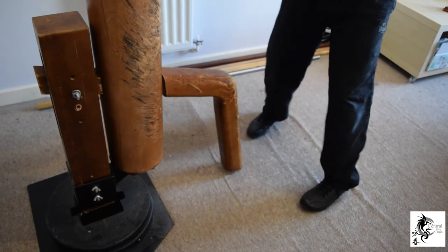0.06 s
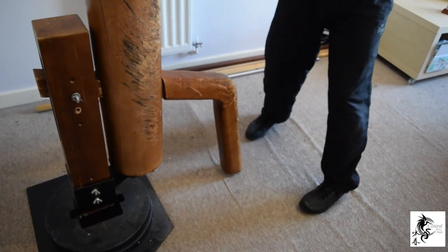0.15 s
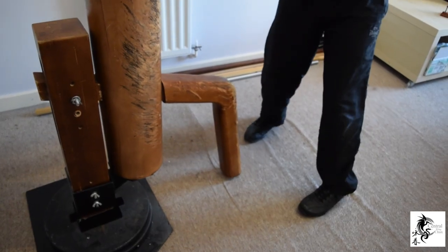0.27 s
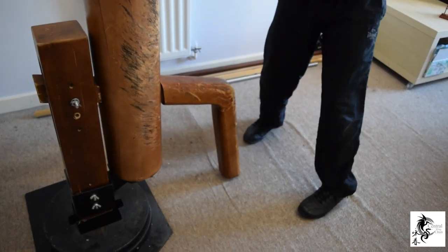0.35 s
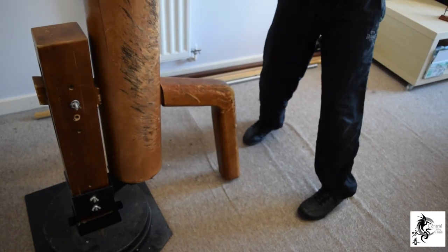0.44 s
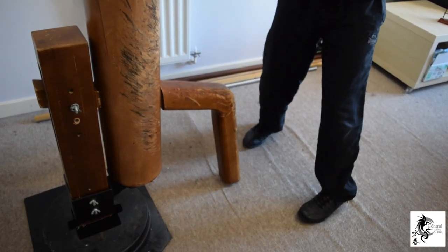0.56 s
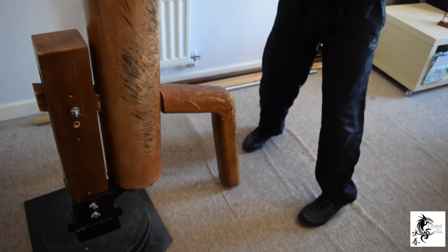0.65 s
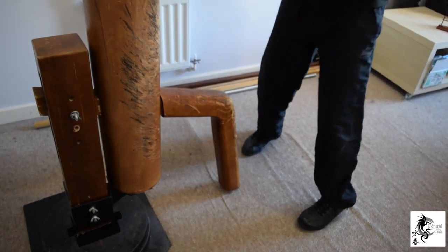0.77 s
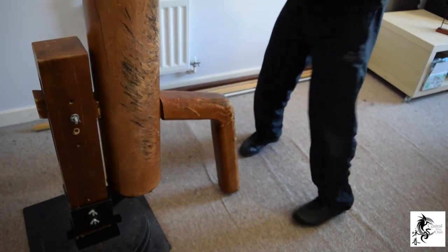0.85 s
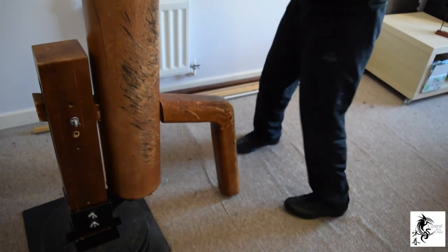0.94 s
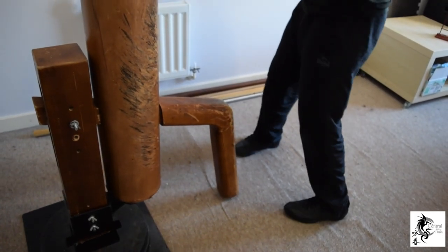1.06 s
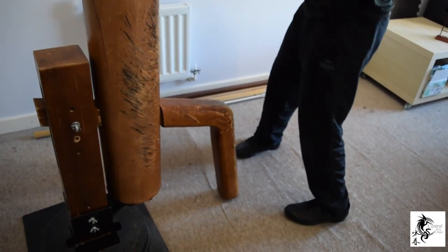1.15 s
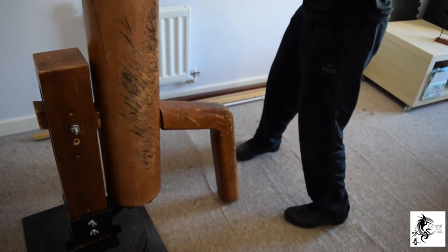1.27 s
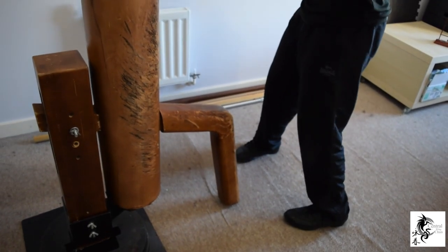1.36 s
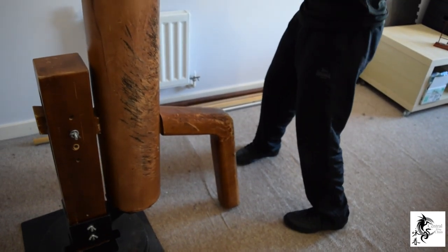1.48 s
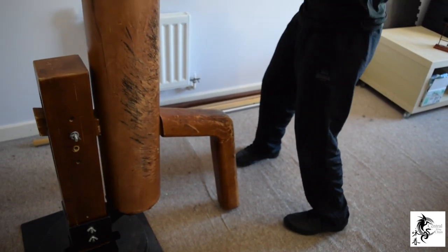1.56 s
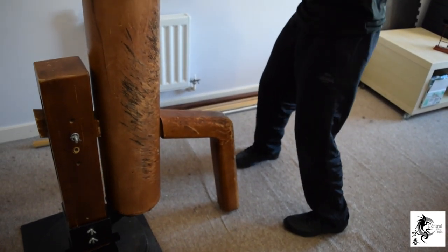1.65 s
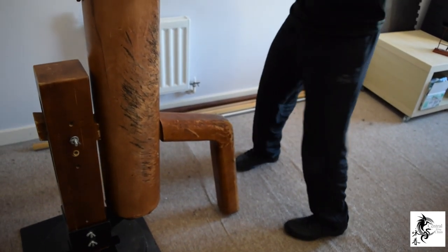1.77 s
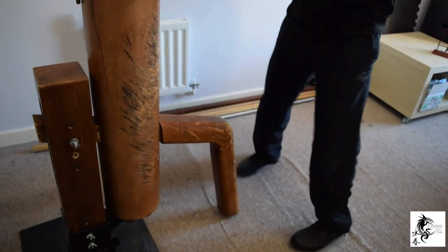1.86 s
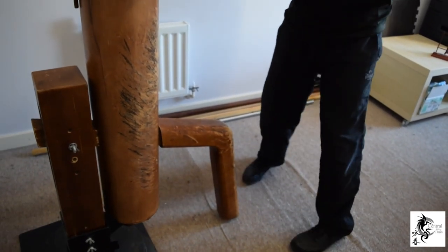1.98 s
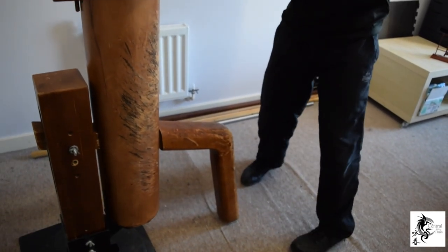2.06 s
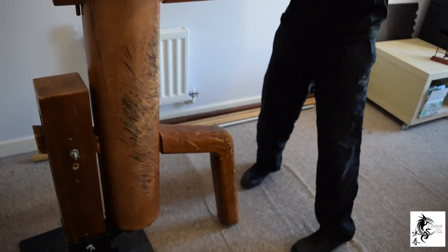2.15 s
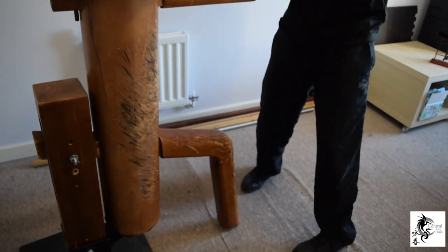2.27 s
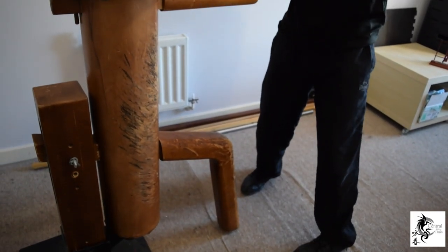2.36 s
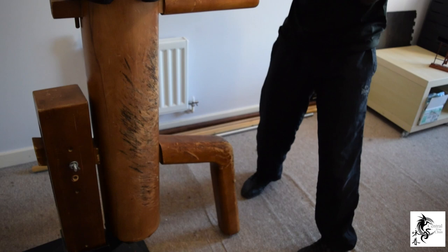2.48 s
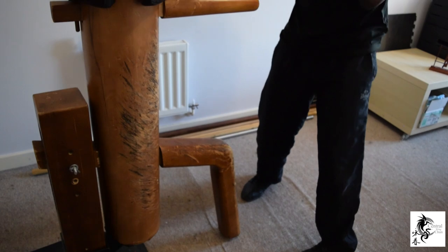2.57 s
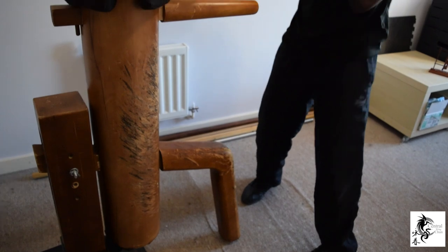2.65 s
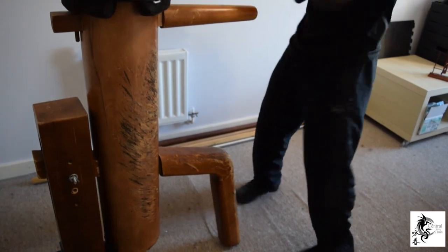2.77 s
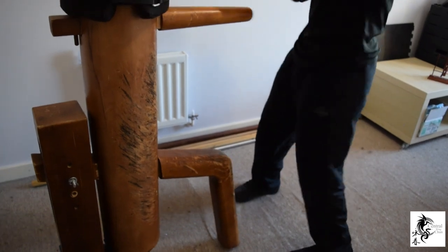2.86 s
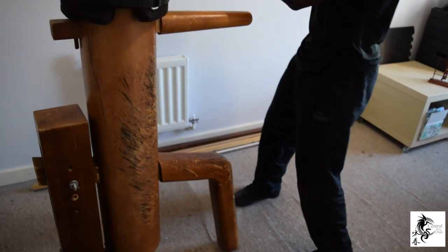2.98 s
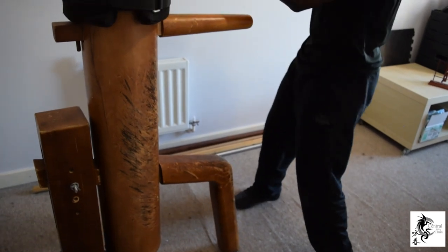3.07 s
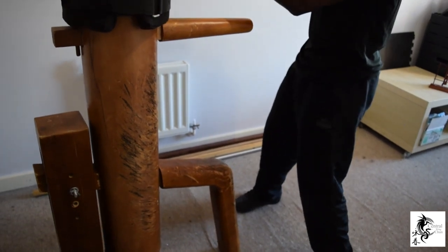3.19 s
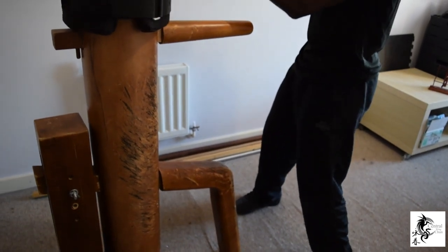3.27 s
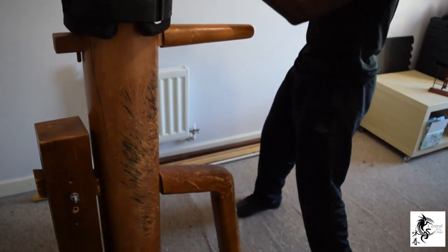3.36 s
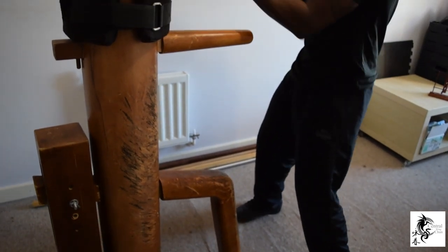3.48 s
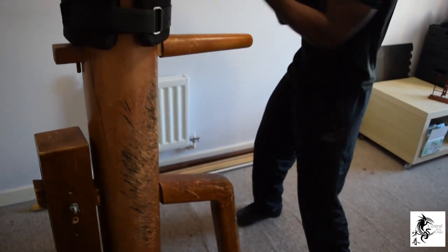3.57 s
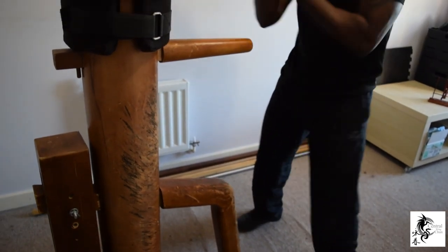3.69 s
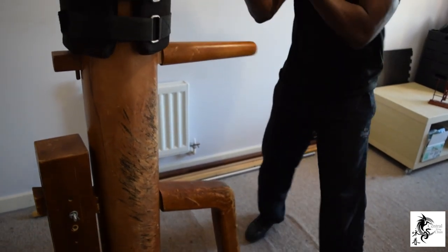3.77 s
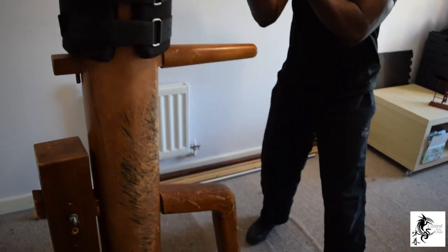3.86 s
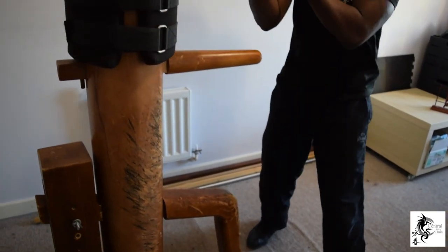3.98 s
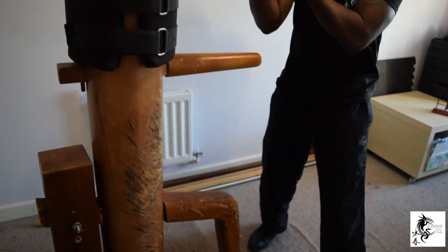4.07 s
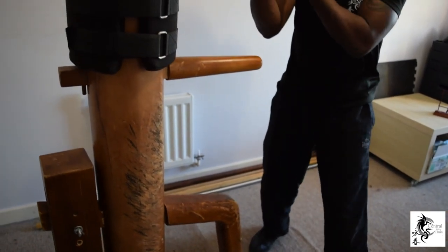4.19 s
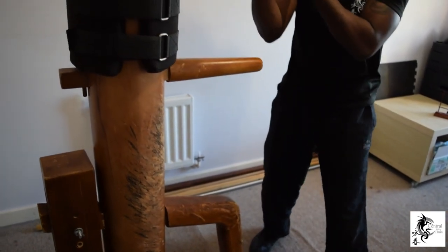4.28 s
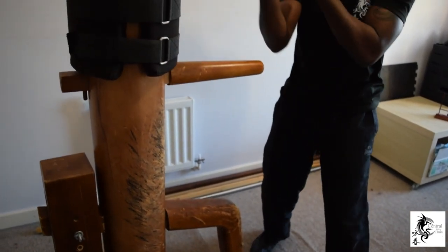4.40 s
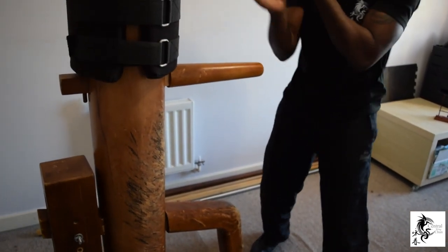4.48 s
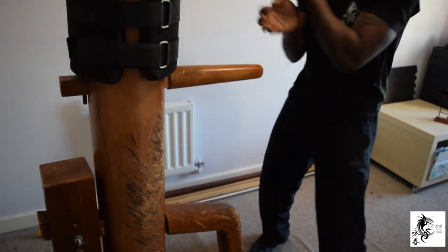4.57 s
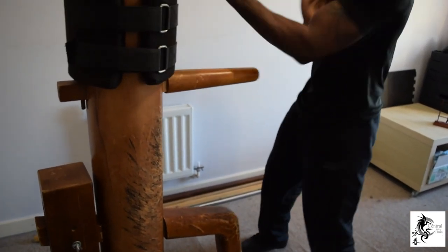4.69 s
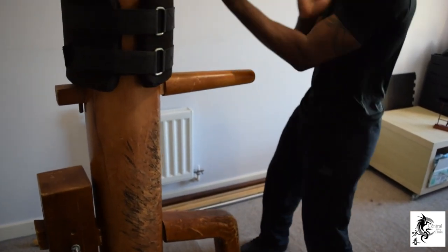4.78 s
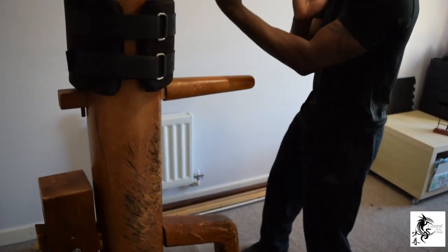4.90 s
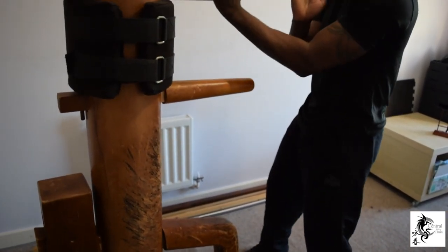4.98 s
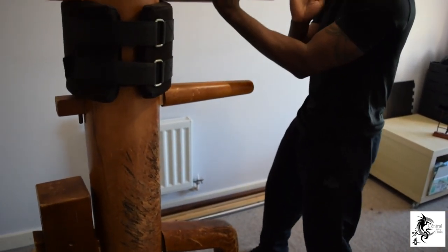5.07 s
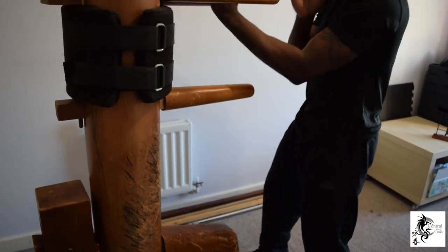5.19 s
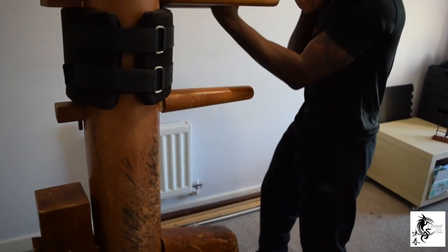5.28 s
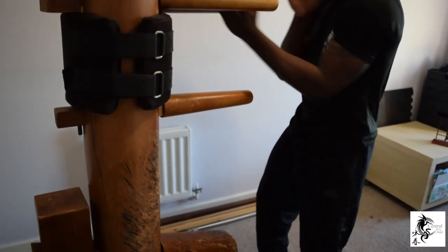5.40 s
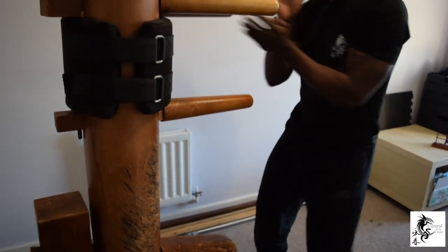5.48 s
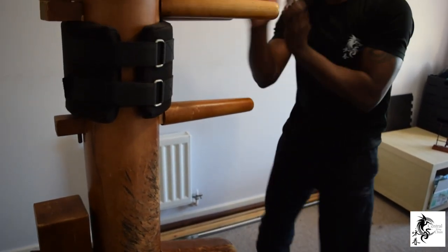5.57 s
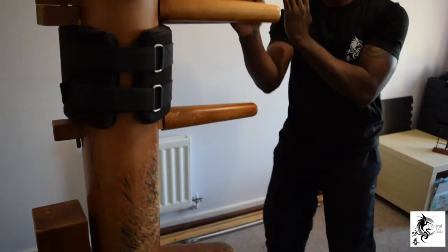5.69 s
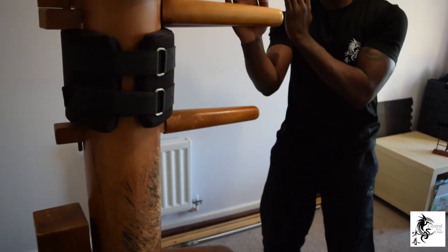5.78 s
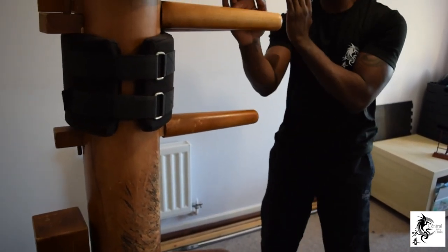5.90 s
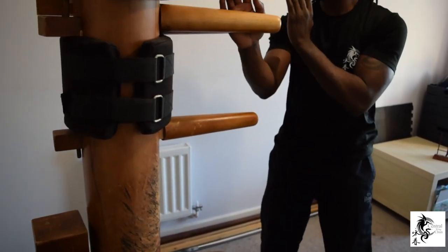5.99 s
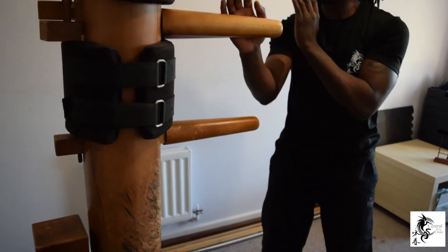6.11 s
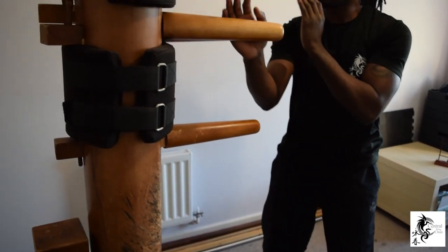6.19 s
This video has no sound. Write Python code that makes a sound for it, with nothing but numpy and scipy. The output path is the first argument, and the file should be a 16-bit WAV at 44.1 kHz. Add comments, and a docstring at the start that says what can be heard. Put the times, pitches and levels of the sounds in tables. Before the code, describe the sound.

A soft flurry of woody knocks opens, then one bright crack on a wooden arm, followed by several quick double and triple knocks on a hollow trunk. Skin slaps sharpen them, loose parts rattle, cloth swishes just before. Between them are faint touches and a very low hush. Small furnished room, microphone a couple of metres away, loudest hits slightly flattened.

```python
"""A small carpeted room, where a wooden training dummy is struck a couple of metres from the microphone.
Blows and rebounds ring clusters of dying sines for trunk, arms, sockets and base, under noise slaps and brushes;
a peg, strap buckles and a small fitting rattle along, and the trunk and a radiator ring on.
Shaped cloth noise gives the sleeves, random taps the room; a thin whistle and a hush lie behind.
The loudest peaks overload the microphone."""
import sys
import numpy as np
from scipy import signal
from scipy.fft import rfft, irfft, next_fast_len
from scipy.io import wavfile
from scipy.ndimage import uniform_filter1d

SR = 44100
rng = np.random.default_rng(int(sys.argv[2]) if len(sys.argv) > 2 else 0)


def bounce(signal):
    """Save signal as a 16-bit WAV file at the path given by the first command-line argument."""
    frames = np.transpose(np.atleast_2d(signal))
    limited = np.clip(frames, -1, 1)
    pcm = np.round(limited * 32767).astype(np.int16)
    wavfile.write(sys.argv[1], SR, pcm)


N = 275267

# Blows and rebounds, levels before the mix:
# (time [s], trunk [dB], arm [dB], socket [dB], slap [dB], contact [ms])
KNOCKS = [(0.047, -25.5, -47.5, -25.5, -23, 5.2), (0.063, -17, -42.5, -37, -22, 4.7),
          (0.112, -21.5, -42.5, -40, -34, 5.3), (0.123, -20.5, -26, -26.5, -33, 6.7),
          (0.169, -29, -29, -41.5, -33, 3.9), (0.196, -25.5, -35, -38.5, -37.5, 7.3),
          (0.261, -38, -52.5, -65, -54, 8), (0.403, -39.5, -51.5, -49, -53.5, 12),
          (0.448, -30.5, -41, -36, -31, 5.3), (0.767, -51.5, -46, -46.5, -48.5, 4.9),
          (1.014, -16, -2, -22, -10, 1.8), (1.034, -34.5, -27, -15.5, -29.5, 2),
          (1.06, -25.5, -24.5, -34.5, -46.5, 2.8), (1.116, -65, -22, -42, -40.5, 3),
          (1.203, -30, -30.5, -36.5, -32, 7), (1.425, -68.5, -57.5, -81, -52.5, 5.5),
          (1.556, -48.5, -58.5, -65, -67, 6.3), (1.912, -53.5, -56, -61, -44, 4.9),
          (1.954, -7, -12, -38.5, -9.5, 1.8), (1.986, -13.5, -28, -20, -12, 4.3),
          (2.017, -11, -16.5, -28, -25.5, 5.6), (2.055, -23, -27.5, -20, -40.5, 4),
          (2.48, -56, -62, -61, -59.5, 7), (2.892, -16, -15, -20, -23.5, 7.4),
          (2.922, -8.5, -16, -12, -20, 3.8), (2.944, -27, -25.5, -21.5, -26.5, 3),
          (3.021, -25, -32.5, -37, -32, 8), (3.074, -64, -42.5, -56, -35.5, 4),
          (3.232, -32.5, -34.5, -34.5, -43, 8.4), (3.422, -73, -67, -49.5, -47.5, 4),
          (3.808, -4, -21.5, -25.5, -16.5, 6.7), (3.82, -18, -8, -9, -12.5, 3.6),
          (3.84, -19, -43.5, -21.5, -6, 1.7), (3.88, -10, -53, -15, -19, 4.1),
          (4.17, -38.5, -46, -48, -50.5, 8), (4.733, -10.5, -11.5, -26, -20.5, 2.9),
          (4.749, -50, -13, -21, -24, 3.5), (4.799, -16, -23.5, -22, -33, 2.3),
          (5.115, -41, -42.5, -45, -57, 9.5), (5.165, -61, -75, -58, -47.5, 5),
          (5.224, -43, -49.5, -48.5, -51, 13), (5.249, -33, -38.5, -39, -38, 4.2),
          (5.556, -63, -56, -74, -64, 6), (5.663, -9.5, -18.5, -26, -23, 4.6),
          (5.676, -11, -25, -25, -26.5, 5.5), (5.712, -12.5, -19, -16, -20, 5.3),
          (6, -30, -31.5, -39, -31, 6.7)]
# Wooden modes of the trunk, the arms, the arm-to-trunk sockets and the base:
# (frequency [Hz], relative level [dB], t60 [s])
TRUNK_MODES = [(443, -31, 0.16), (607.3, -16.5, 0.01), (621.6, 2, 0.044), (720, -18, 0.072),
               (809, -1.5, 0.047), (809, 18, 0.019)]
ARM_MODES = [(982, 5.5, 0.02), (1038, 0, 0.019), (1108, -5.5, 0.028), (1251, 5, 0.019), (1297, -0.5, 0.018),
             (2076, -11, .03), (2740, -15, 0.029)]
SOCKET_MODES = [(1370.4, -11, 0.037), (1555, 6.5, 0.019), (1831, -8.5, 0.041), (2077, -10.5, 0.017),
                (2402, -7.5, .03), (2650, -31, 0.011), (2910, -20, .02)]
BASE_MODES = [(60, -28, 0.058), (137, -13.5, 0.037), (243, -2.5, 0.026), (312.6, -12.5, 0.087),
              (417, 6.5, 0.018)]
# Tone of the slapping skin, and of skin sliding onto wood: (frequency [Hz], relative level [dB])
SLAP_TONE = [(300, -7.5), (1000, 8.5), (2500, 3), (5000, -7.5), (9000, -17), (15000, -27)]
BRUSH_TONE = [(400, -5.5), (1200, -3.5), (3000, -7), (8000, -24.5)]
# The trunk's long after-ring: (frequency [Hz], level [dB], t60 [s])
TRUNK_AFTER_RING = [(770, -33, .9), (808, -30.5, 1.01), (836, -32.5, .9)]
# A radiator ringing along with the arm: (level [dB], t60 [s])
RADIATOR = (-35, 1.3)
# Extra low thud of the base at some knocks, light and heavy: (time [s], level [dB])
BASE_THUDS = [(0.048, -38), (0.124, -32.5), (0.197, -38.5), (1.203, -35), (1.953, -32), (2.892, -19.5),
              (2.944, -33), (3.232, -43.5), (3.808, -27), (3.82, -27), (3.88, -35), (4.749, -26),
              (5.711, -34.5), (5.999, -41.5)]
# Peg and buckles rattling along with some of the knocks: (time [s], peg [dB], buckles [dB])
RATTLES = [(0.122, -30.5, -56), (1.016, -32, -43.5), (1.953, -39, -40), (1.988, -26.5, -32),
           (2.016, -25, -27), (2.056, -36, -45), (2.891, -45, -54), (2.922, -37, -46), (3.021, -54.5, -57),
           (3.421, -87, -62.5), (3.808, -24.5, -61.5), (3.821, -40, -38.5), (3.84, -21.5, -19.5),
           (3.879, -33, -54), (4.749, -34.5, -48.5), (4.798, -35.5, -54.5), (5.712, -25.5, -44),
           (5.998, -47, -81)]
# The small fitting ticking: (time [s], level [dB])
TICKS = [(0.063, -35), (3.232, -65), (3.425, -57), (5.252, -63), (5.305, -59)]
# Modes of the arm's locking peg, the pad-strap buckles and the small loose fitting:
# (frequency [Hz], relative level [dB], t60 [s])
PEG_MODES = [(3850, 0, .03), (3980, -3, .03), (4350, -7, .025)]
BUCKLE_MODES = [(5600, -13, .012), (6100, -13, .012), (9600, -2, .015), (10000, 0, .015),
                (11200, -10, .015)]
FITTING_MODES = [(5300, -3, .02), (5650, 0, .02), (6000, -4, .02)]
# Sleeves swinging: (start [s], end [s], level at the end [dB], swell over the swing [dB])
SLEEVES = [(-0.04, 0.06, -34.5, -1), (0.66, 0.755, -65.5, 9.5), (0.9, 1.005, -49.5, -5),
           (1.83, 1.938, -50.5, -4), (2.27, 2.46, -77, -17.5), (2.78, 2.92, -44.5, 2.5),
           (3.27, 3.415, -66, -8), (3.7, 3.797, -43, 10.5), (4.63, 4.733, -45.5, -0.5),
           (5.54, 5.67, -41, 12.5)]
# Tone of the cloth: (frequency [Hz], relative level [dB])
CLOTH_TONE = [(59, -42), (100, -25.5), (241, -16), (391, -7), (1110, 1), (1660, -2.5), (2320, -6),
              (9660, -18), (15000, -26.5)]
# Decay of the room per band: (frequency [Hz], t60 [s])
ROOM_DECAY = [(100, 0.36), (300, 0.58), (800, 0.39), (1500, 0.47), (3000, 0.33), (6000, 0.46),
              (12000, 0.24)]
# Carpet and furniture dulling the echoes: (frequency [Hz], gain [dB])
WALL_TONE = [(200, -2.5), (1000, -1), (3000, -4.5), (7000, -8.5), (14000, -9)]
# Thin faint whistles, as of a bird outside, one list each: (time [s], frequency [Hz], level [dB])
WHISTLES = [
    [(1.27, 9800, -80), (1.36, 9100, -81), (1.47, 7500, -87)],
    [(4.95, 9500, -94), (5.02, 9160, -81), (5.14, 8800, -95)],
]
# Tone of the background hush: (frequency [Hz], relative level [dB])
HUSH_TONE = [(24, -38.5), (40, -7.5), (54, -8), (136, -16.5), (522, -18), (797, -8), (1190, -13),
             (1280, -11.5), (10900, -31.5), (13700, -43), (15500, -57)]
# Microphone colour: (frequency [Hz], gain [dB])
MIC_TONE = [(40, -10.5), (150, -9.5), (300, -1.5), (600, -3)]
# Colour of the difference between the two microphone ports: (frequency [Hz], gain [dB])
WIDTH_TONE = [(60, -20), (150, -23), (380, -42.5), (950, -22), (2380, -12), (5980, -12.5), (15000, 1.5)]

THUD_DB, THUD_SLOPE = -35.5, 0.47  # the base thuds more as the knock grows, but far less than in step
WOOD_SPREAD, LOOSE_SPREAD = .022, .028  # relative width of a mode cluster
BLUR_PER_MS, BLUR_FROM_MS = .01, 4.5  # a long contact smears the modes
SLAP_STRETCH = 1.445  # the slap peaks this many contact times after the touch
BRUSH_DB, BRUSH_DB_PER_MS = -16.5, -0.55  # a long contact lands with less of a brush
RADIATOR_HZ = 1208
BASE_THUD_MS, RATTLE_MS = 2.6, 2.8  # rise times
SWING_RISE_S, SWING_FROM_DB = 0.031, -19.5  # each swing starts this far below the end of its rise
SWING_ON_S = 0.0088  # the cloth moves on into the blow
HUSH_DB = -70
EDGE_HZ = 15750  # upper band limit


def gain_of(db):
    """Turns decibels into amplitude."""
    return 10 ** (np.asarray(db) / 20)


def evened(x):
    """Scales a sound to rms 1."""
    return x / np.sqrt(np.mean(x ** 2) + 1e-20)


def read(points, hz):
    """Reads a (frequency, value) table on a log-frequency axis."""
    f, value = np.transpose(points)
    return np.interp(np.log(hz + 1), np.log(f + 1), value)


def add(mix, s, sound):
    """Mixes a sound in at s seconds."""
    part = mix[round(s * SR):][:len(sound)]
    part += sound[:len(part)]


def coloured(x, points):
    """Filters x by a (frequency, dB) table."""
    size = next_fast_len(len(x))
    gain = gain_of(read(points, np.fft.rfftfreq(size, 1 / SR)))
    return irfft(rfft(x, size) * gain, size)[:len(x)]


def chances(*shape):
    """Draws level, detune and phase for up to seven modes of four sines each."""
    return rng.standard_normal((*shape, 3, 7, 4))


def ring(modes, chance, rise_ms, spread):
    """Each mode is a close cluster of dying sines, with levels, detuning and phases random for each ring."""
    hz, db, t60 = np.transpose(modes)[:, :, None, None]
    loud, detune, phase = chance[:, :len(modes), :, None]
    t = np.arange(3500) / SR
    scatter_db = 1.5
    waves = np.sin(2 * np.pi * (hz * (1 + spread * detune) * t + phase))
    decay = gain_of(db + scatter_db * loud - 60 * t / t60)
    rings = (decay * waves).sum((0, 1))
    rings = rings * (1 - np.exp(-(t * 1000 / rise_ms) ** 2))  # a soft contact swells in
    return rings / np.sqrt(np.mean(rings[:900] ** 2))  # the first 20 ms set the level


def wood_knocks():
    """Each contact swells the modes of trunk, arm, socket and base; longer contacts rise slower."""
    out = np.zeros(N)
    parts = (TRUNK_MODES, ARM_MODES, SOCKET_MODES, BASE_MODES)
    for (s, trunk_db, arm_db, socket_db, _, ms), chance in zip(KNOCKS, chances(len(KNOCKS), 4)):
        thud_db = THUD_DB + THUD_SLOPE * max(trunk_db, arm_db, socket_db)
        spread = WOOD_SPREAD + BLUR_PER_MS * max(ms - BLUR_FROM_MS, 0)
        for db, modes, c in zip((trunk_db, arm_db, socket_db, thud_db), parts, chance):
            add(out, s - .002, gain_of(db) * ring(modes, c, ms, spread))
    return out


def skin():
    """A burst of noise slaps at each contact, after a short brush of skin on wood just before it."""
    out = np.zeros(N)
    for s, trunk_db, arm_db, _, slap_db, ms in KNOCKS:
        noise = evened(coloured(rng.standard_normal(2500), SLAP_TONE))
        u = np.arange(2500) / SR * 1000 / (SLAP_STRETCH * ms)
        add(out, s, gain_of(slap_db) * noise * u * np.exp(1 - u))
        brush = np.hanning(300) * evened(coloured(noise[-300:], BRUSH_TONE))
        brush_db = max(trunk_db, arm_db) + BRUSH_DB + BRUSH_DB_PER_MS * ms
        add(out, s - .006, gain_of(brush_db) * brush)
    return out


def after_rings():
    """Trunk blows set off long hollow sines, and arm blows a radiator sine; both swell in and die."""
    arms, trunks = np.zeros((2, N))
    for s, trunk_db, arm_db, *_ in KNOCKS:
        add(arms, s, gain_of([arm_db]))
        add(trunks, s, gain_of([trunk_db]))
    t = np.arange(SR) / SR

    def dying_sine(hz, db, t60):
        """A sine losing 60 dB in t60 seconds."""
        return gain_of(db - 60 * t / t60) * np.sin(2 * np.pi * hz * t)

    radiator = dying_sine(RADIATOR_HZ, *RADIATOR) * (1 - np.exp(-t / .02))
    hollow = sum(dying_sine(*row) for row in TRUNK_AFTER_RING) * (1 - np.exp(-t / .03))
    return (signal.fftconvolve(arms, radiator) + signal.fftconvolve(trunks, hollow))[:N]


def struck(rows, modes, rise_ms, spread):
    """Rings one part alone at each (time, dB) row."""
    out = np.zeros(N)
    for (s, db), c in zip(rows, chances(len(rows))):
        add(out, s, gain_of(db) * ring(modes, c, rise_ms, spread))
    return out


def base_thuds():
    """The base modes ring once more, as an extra low thud at some knocks."""
    return struck(BASE_THUDS, BASE_MODES, BASE_THUD_MS, WOOD_SPREAD)


def rattles():
    """The peg and the buckles ring their own modes along with some of the knocks."""
    pegs = [(s, peg_db) for s, peg_db, _ in RATTLES]
    buckles = [(s, buckles_db) for s, _, buckles_db in RATTLES]
    return (struck(pegs, PEG_MODES, RATTLE_MS, LOOSE_SPREAD)
            + struck(buckles, BUCKLE_MODES, RATTLE_MS, LOOSE_SPREAD))


def fitting_ticks():
    """The small loose fitting rings its high modes at each tick."""
    return struck(TICKS, FITTING_MODES, RATTLE_MS, LOOSE_SPREAD)


def sleeves():
    """Cloth noise, slightly grainy: each swing rises quickly, swells or sinks, and stops."""
    grain = gain_of(1.2 * evened(uniform_filter1d(rng.standard_normal(N), 150)))
    cloth = evened(coloured(rng.standard_normal(N) * grain, CLOTH_TONE))
    level, t = np.zeros(N), np.arange(N) / SR
    for start, end, db, swell_db in SLEEVES:
        corners = [start, start + SWING_RISE_S, end]
        shape_db = np.interp(t, corners, [SWING_FROM_DB - swell_db, -swell_db, 0])
        fade = np.clip(1 - (t - end) / SWING_ON_S, 0, 1)
        level += gain_of(db + shape_db) * (t > start) * fade
    return cloth * level


def room(x):
    """Three tails of sparse random taps take turns, each band dying at its own speed."""
    taps = np.zeros((3, SR))
    slots = np.arange(150, SR - 20, 20)  # one tap in every 20 samples
    at = slots + rng.integers(0, 20, (3, len(slots)))
    np.put_along_axis(taps, at, rng.choice([-1., 1.], at.shape), 1)
    hz, t, z = signal.stft(taps, SR, nperseg=256)
    decay = gain_of(-60 * t / read(ROOM_DECAY, hz)[:, None])
    tails = signal.istft(z * decay, SR, nperseg=256)[1]
    # the three weights keep a constant total power
    phase = 7.3 * np.arange(N) / SR + np.arange(3)[:, None] / 3
    turns = np.cos(np.pi * phase) * np.sqrt(2 / 3)
    return signal.fftconvolve(x * turns, tails / np.linalg.norm(tails[0]), axes=1)[:, :N].sum(0)


def whistle():
    """A near-sine glides in pitch while its level wavers at random."""
    out = np.zeros(N)
    for rows in WHISTLES:
        s, hz, db = np.transpose(rows)
        t = np.arange(s[0], s[-1], 1 / SR)
        waver = .5 + 0.78 * evened(uniform_filter1d(rng.standard_normal(len(t)), 300))
        tone = np.sin(2 * np.pi * np.cumsum(np.interp(t, s, hz)) / SR)
        add(out, s[0], waver * gain_of(np.interp(t, s, db)) * tone)
    return out


def hush(db):
    """Steady coloured noise lies under everything."""
    return gain_of(db) * evened(coloured(rng.standard_normal(N), HUSH_TONE))


def scene():
    """Mixes near sounds, room and background as mid and side, then spreads them to two channels."""
    near = wood_knocks() + skin() + after_rings() + base_thuds() + rattles() + fitting_ticks() + sleeves()
    echoes = coloured(room(near), WALL_TONE)
    mid = coloured(gain_of(-9.0) * near + gain_of(-6.5) * echoes, MIC_TONE)
    mid = mid + hush(HUSH_DB) + whistle()
    # close ports differ in phase, mostly in the treble
    phase_shifted = signal.hilbert(near, next_fast_len(N))[:N].imag
    side = gain_of(-22.5) * room(near) + gain_of(-20.5) * phase_shifted + hush(HUSH_DB + 8.0)
    side = coloured(side, WIDTH_TONE)
    return np.array([mid + side, mid - side])


def record(dry):
    """The input stage flattens peaks with a firm knee and sits a little off zero; then the band limit."""
    ceiling, knee, offset = .24, 4.0, -.0006
    clipped = dry / (1 + abs(dry / ceiling) ** knee) ** (1 / knee) + offset
    low_pass = signal.firwin(511, EDGE_HZ, window=("kaiser", 9), fs=SR)
    return signal.oaconvolve(clipped, low_pass[None], "same")


dry = scene()
out = record(dry)
bounce(out)
```